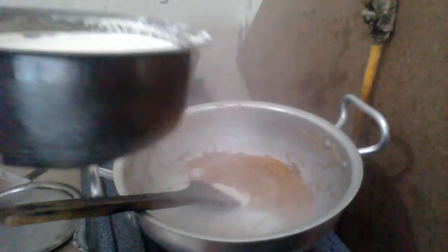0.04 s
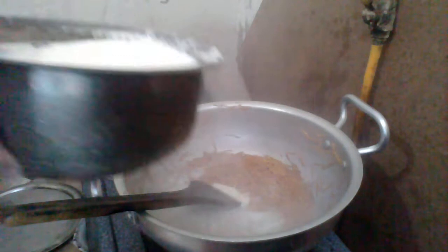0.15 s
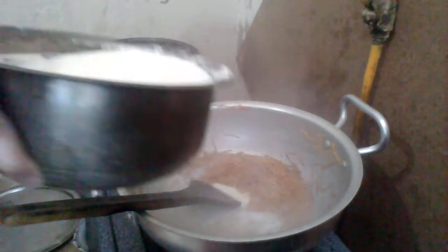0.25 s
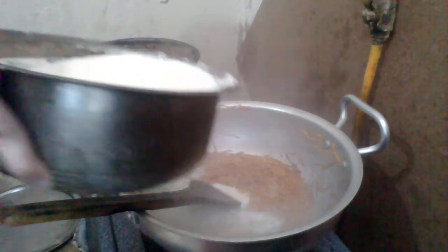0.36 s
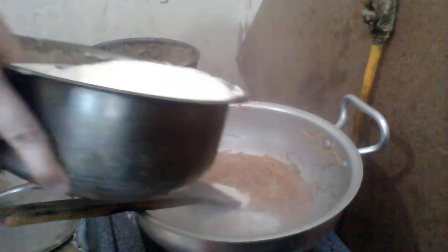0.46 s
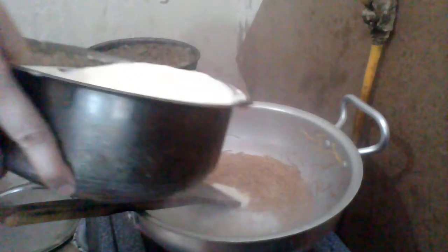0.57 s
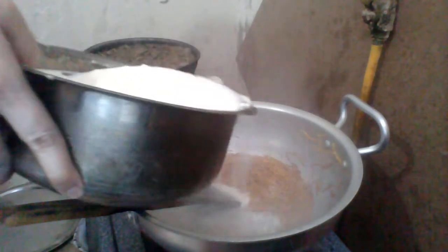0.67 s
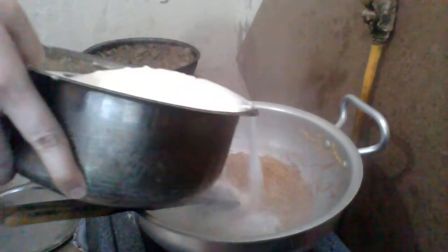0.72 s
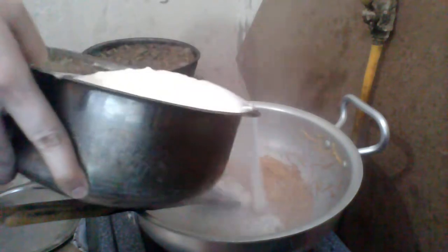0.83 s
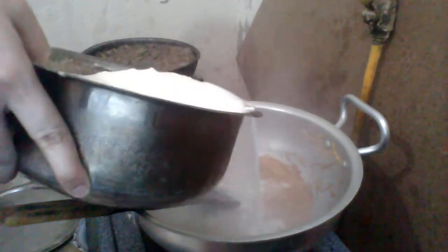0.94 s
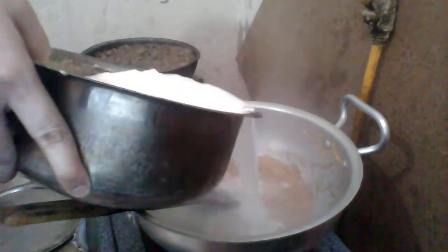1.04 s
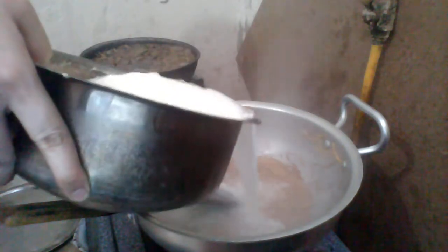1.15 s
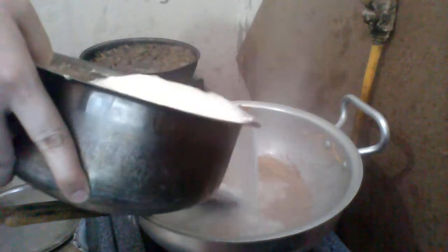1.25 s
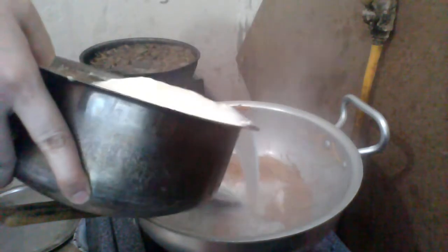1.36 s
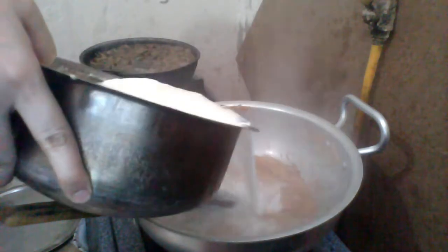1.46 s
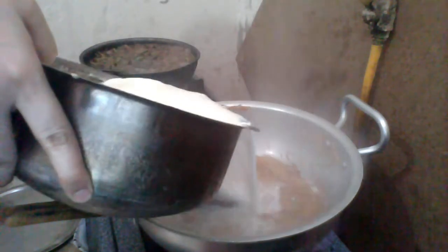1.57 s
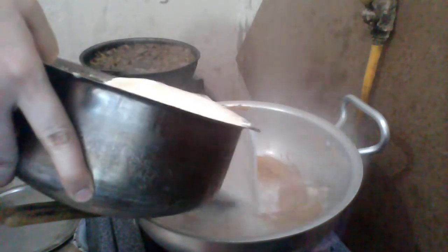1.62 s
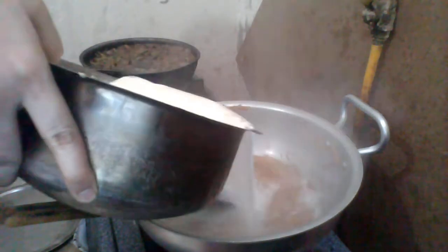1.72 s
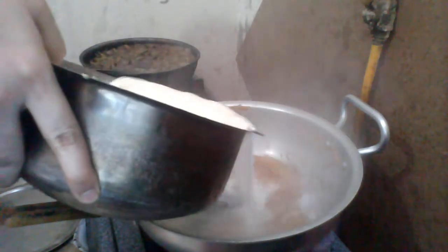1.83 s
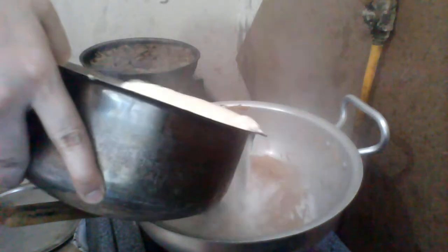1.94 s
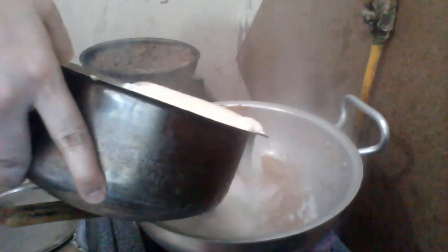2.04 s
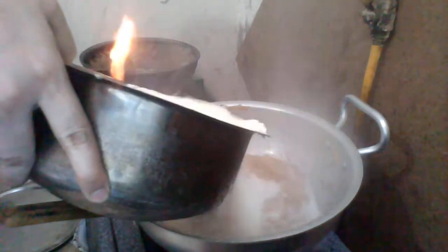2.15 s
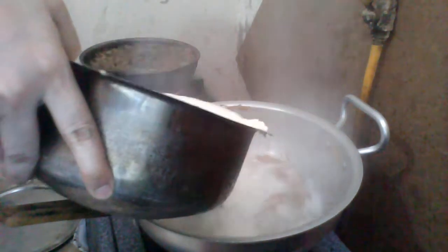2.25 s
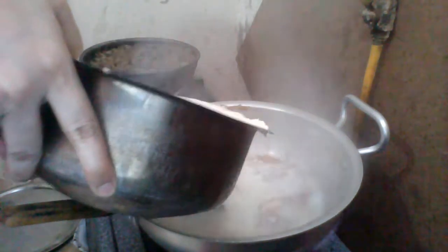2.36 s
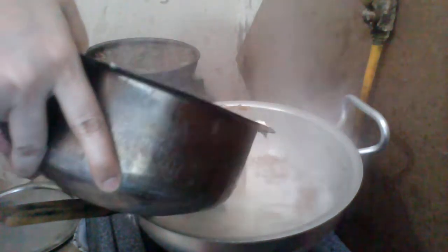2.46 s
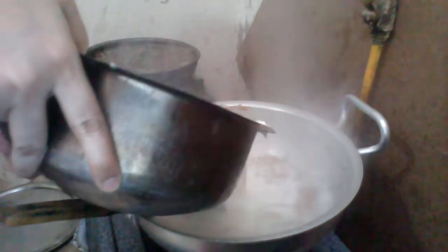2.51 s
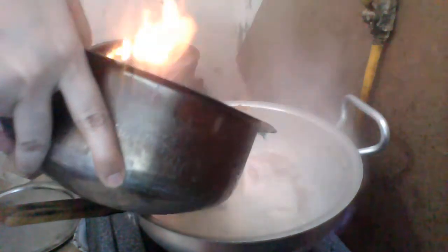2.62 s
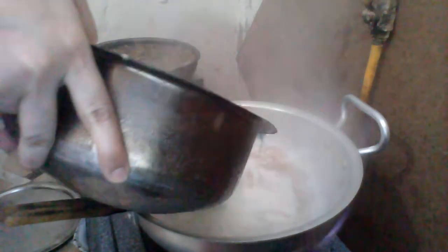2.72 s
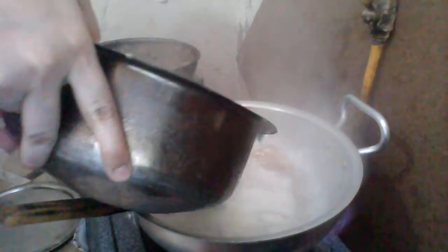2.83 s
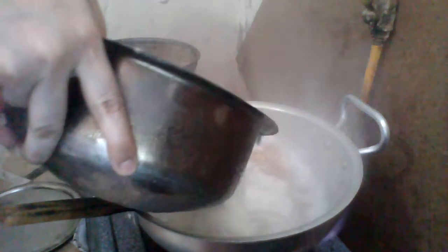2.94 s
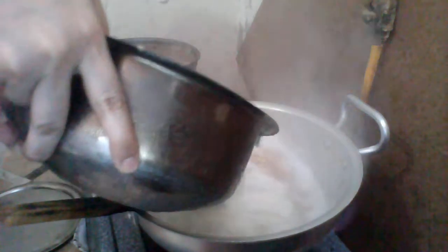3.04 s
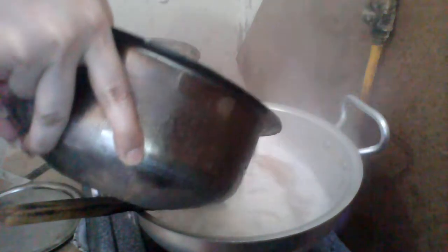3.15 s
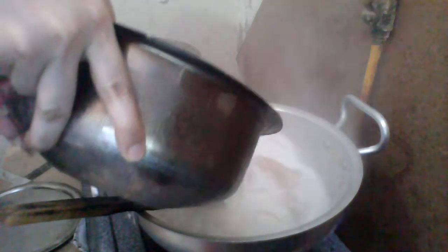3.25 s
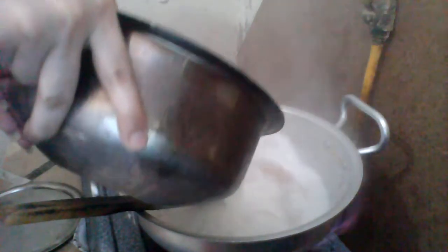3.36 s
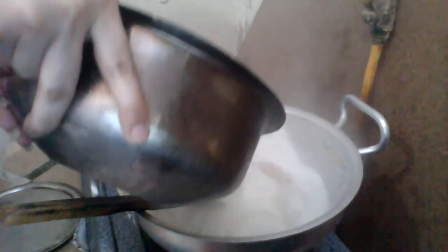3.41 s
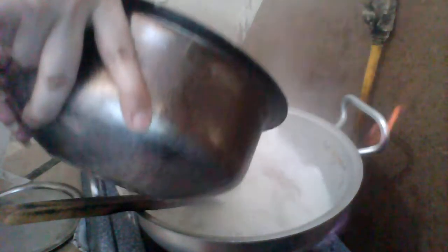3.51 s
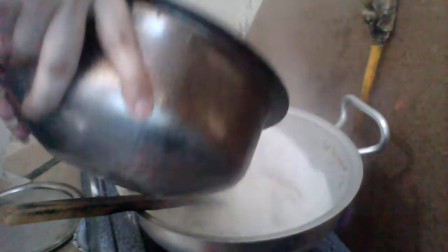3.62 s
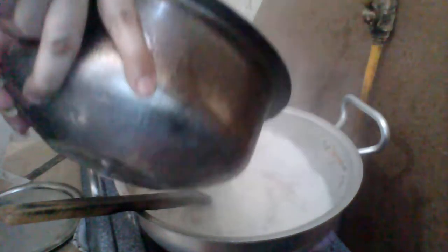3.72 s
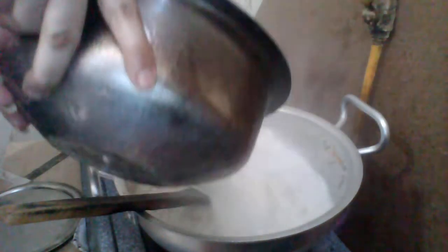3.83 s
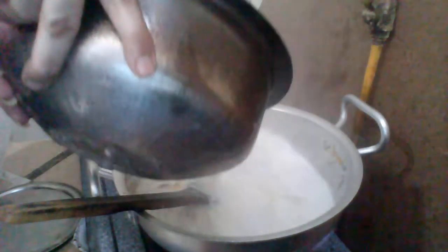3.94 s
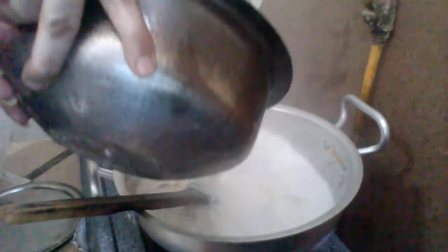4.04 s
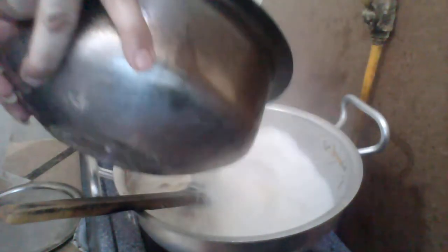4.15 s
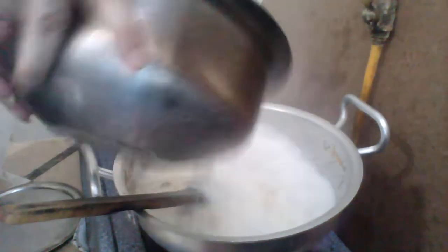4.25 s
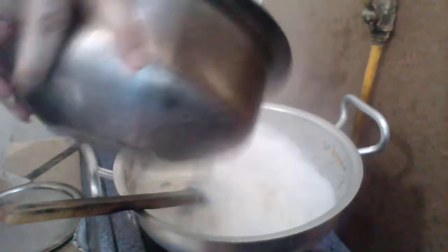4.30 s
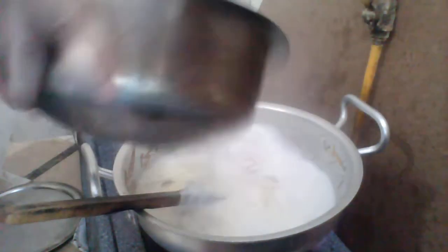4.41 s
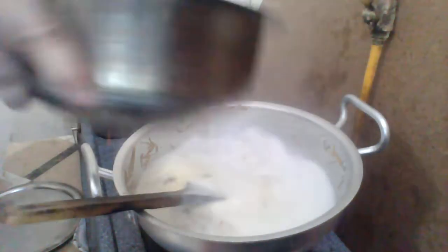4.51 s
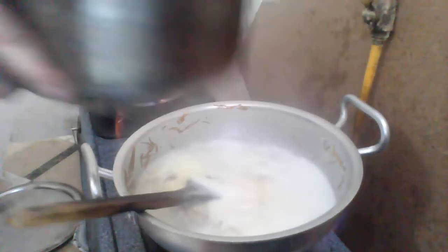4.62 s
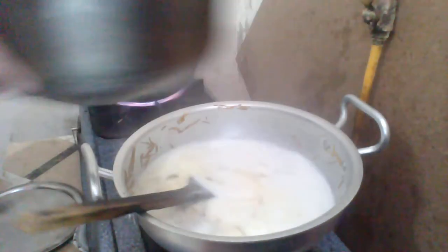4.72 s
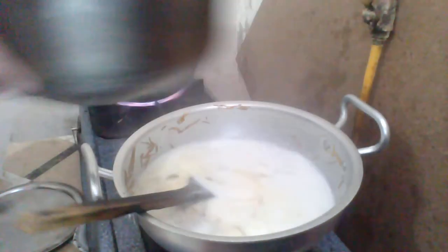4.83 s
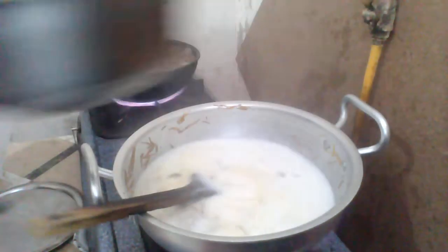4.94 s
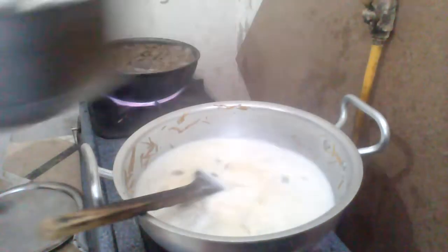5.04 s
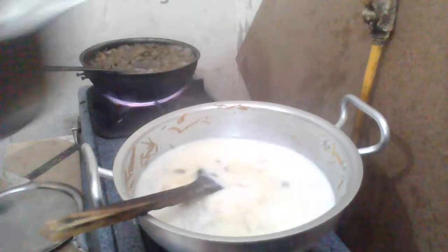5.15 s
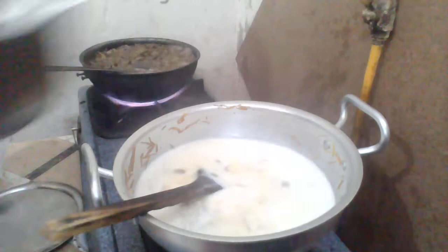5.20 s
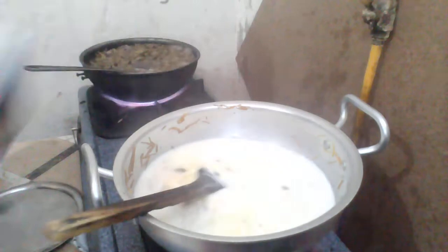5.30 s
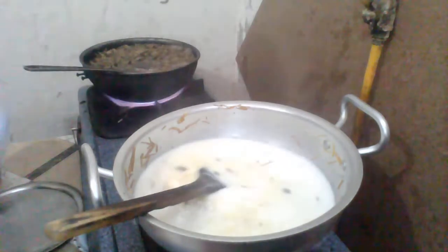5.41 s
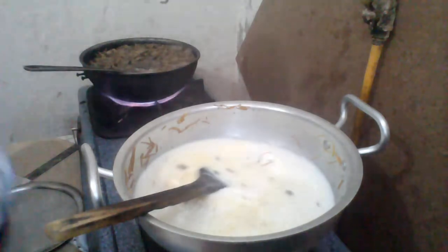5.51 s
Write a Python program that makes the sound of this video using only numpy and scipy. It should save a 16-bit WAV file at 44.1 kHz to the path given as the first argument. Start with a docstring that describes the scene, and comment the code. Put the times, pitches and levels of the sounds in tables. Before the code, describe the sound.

Hot fat sizzles and spits in a metal pan, then hisses, squeals and bubbles as milk goes in, gradually calming down.

```python
"""Milk poured into a hot pan

Milk hits a very hot metal pan of ghee and noodles, heard close up in a small kitchen with a gas stove.
The fat sizzles and spits. The milk flashes to steam on the bare metal, roaring and squealing in the
hollow of the pan, gurgles as the pool deepens, then cools the pan until only a soft fizz is left."""
import sys
import numpy as np
from scipy import signal
from scipy.fft import rfft, irfft, next_fast_len
from scipy.io import wavfile
from scipy.ndimage import map_coordinates

SR = 44100
rng = np.random.default_rng(int(sys.argv[2]) if len(sys.argv) > 2 else 0)


def output_pcm(signal):
    """Save a mono or channel-first signal as 16-bit PCM at the path in sys.argv[1].

    Samples are clipped to [-1, 1] before scaling.
    """
    pcm = np.clip(np.atleast_2d(signal).T, -1, 1) * 32767
    wavfile.write(sys.argv[1], SR, np.round(pcm).astype(np.int16))


N = 245504
TIME = np.arange(N) / SR
TOP_HZ = 8199  # spits and the final sound are cut off above this

# The sizzle fades as the milk cools the pan: (time [s], level [dB])
SIZZLE_LEVEL = [(0, -45), (0.75, -47), (1.5, -44.5), (2.08, -45), (2.6, -42.5), (2.74, -45), (3.3, -46.5),
                (3.7, -49.5), (4.05, -49.5), (4.38, -54.5), (4.85, -57), (5.57, -61.5)]
# How much of the pan's floor is under milk: (time [s], share [0-1])
MILK_COVER = [(0, 0.08), (1, 0.46), (2, 0.58), (3, 0.91), (5.57, 0.64)]
# The sizzle sputters while milk wets only patches of the fat: (time [s], flutter depth [dB])
SIZZLE_FLUTTER = [(0, .65), (1.05, 1), (1.6, .7), (3, .55), (5.57, .55)]
# The tone of frying fat, from low to high: (frequency [Hz], level [dB])
FAT_TONE = [(200, -33), (450, -25.5), (780, -25.5), (1100, 4.5), (1450, -6), (1900, 1.5), (2500, 1.5),
            (2880, 0.5), (3200, 2), (4000, 0.5), (4800, -2), (6300, -3.5), (7000, -10), (8000, -24.5)]

def sizzle(surge):
    """Water crackles in hot fat; milk foam makes finer bubbles than bare ghee, and the metal rings."""
    cover = over_time(MILK_COVER)
    crackle = coloured(bursts(per_second=5000, spread_db=2) + 0.67 * rng.standard_normal(N), FAT_TONE)
    fine = filtered(crackle, lambda hz: 1 / (1 + (4600 / (hz + 1)) ** 6))
    coarse = filtered(crackle, lambda hz: 1 / (1 + (hz / 1400) ** 6))
    fine_db = 7.64 * cover - 4
    coarse_db = 0.5 - 0.3 * TIME  # the largest bubbles slowly fade
    frying = crackle + coarse * (amp(coarse_db) - 1) + fine * (amp(fine_db) - 1)
    ring = unit(filtered(bursts(per_second=5000, spread_db=1.5), metal))
    flutter_db = over_time(SIZZLE_FLUTTER) * (wobble(36) + 0.98 * wobble(100))
    level = np.hypot(amp(over_time(SIZZLE_LEVEL)), amp(-11.5) * surge)  # gushes add sizzle
    return level * amp(flutter_db) * (frying + amp(-3) * cover * ring)


# The notes at which the metal pan rings: (pitch [Hz], width [Hz], level [dB])
PAN_NOTES = [(2505, 130, 6.5), (2655, 120, 4.5), (3070, 100, -2), (3516, 210, 3), (4000, 150, -2),
             (4410, 170, -3), (4920, 110, -3.5), (5320, 81, -8), (5700, 100, -7.5), (6040, 220, -3)]

def metal(hz):
    """How strongly the pan rings at each frequency: all its notes added together."""
    return sum(amp(db) * resonance(hz, centre, width) for centre, width, db in PAN_NOTES)


# The notes of the air in the pan: (pitch [Hz], width [Hz], simmer level [dB], gush level [dB])
AIR_NOTES = [(563.4, 102, -2, -2), (1023, 122, -1.5, -1), (1183, 156, 5.5, 2), (1396, 45, -17.5, 2),
             (1682, 190, 5.5, 4), (2190, 260, -4, -3.5), (2595, 52, -4.5, -16.5)]

def boil(surge):
    """Bubbles collapse on the pan's floor and sound the air above; each note flickers by itself."""
    collapses = bursts(per_second=6000, spread_db=4)
    simmer, roar = np.zeros((2, N))
    for centre, width, simmer_db, gush_db in AIR_NOTES:
        flicker = amp(1.6 * wobble(30))
        # squaring makes the peak's sides steeper; the 1.5 roughly restores its width
        air = flicker * filtered(collapses, lambda hz: resonance(hz, centre, 1.5 * width) ** 2)
        simmer += amp(simmer_db) * air
        roar += amp(gush_db) * air
    steady = amp(over_time(SIZZLE_LEVEL) - 6.5 - 0.5 * TIME)  # fades faster than the sizzle
    return (steady ** 2 * unit(simmer) + surge ** 2 * unit(roar)) / np.hypot(steady, surge)


# Gushes of milk: (time [s], half length [s], boiling level [dB], gurgling level [dB])
MILK_GUSHES = [(1.036, 0.044, -53.5, -89), (1.44, 0.027, -56, -69), (1.575, 0.055, -44, -81),
               (1.81, 0.086, -38.5, -73), (2.253, 0.033, -40, -53.5), (2.46, 0.073, -40, -58.5),
               (2.611, 0.019, -40, -51), (2.676, 0.049, -53, -51.5), (2.855, 0.04, -58, -56),
               (3.252, 0.094, -53, -63.5), (3.452, 0.056, -69, -64.5)]

def gushes():
    """Each gush swells and ebbs, boiling up on the metal (surge) and stirring the pool (churn)."""
    surge, churn = np.zeros((2, N))
    for peak_s, half_s, boil_db, gurgle_db in MILK_GUSHES:
        swell = np.exp(-((TIME - peak_s) / half_s) ** 2 / 2)
        surge = np.maximum(surge, amp(boil_db) * swell)
        churn = np.maximum(churn, amp(gurgle_db) * swell)
    return surge, churn


def stream(start_s=1.57, peak_s=2.617, build_db_per_s=58.5, grow_db_per_s=10, die_db_per_s=66.5):
    """The milk stream's strength: it builds quickly, grows as the pot tilts and dies as it empties."""
    fade_in_db = -build_db_per_s * np.maximum(start_s - TIME, 0)
    past_peak = TIME - peak_s
    return amp(fade_in_db + np.minimum(grow_db_per_s * past_peak, -die_db_per_s * past_peak))


# The loudest steam squeals: (start [s], length [s], pitch [Hz], level [dB])
LOUD_SQUEALS = [(0.209, 0.011, 1246, -45), (0.772, 0.03, 570, -54.5), (0.96, 0.16, 950, -55),
                (1.05, 0.05, 1730, -51), (1.215, 0.059, 600, -53.5), (1.263, 0.059, 1665, -45),
                (1.2, .26, 5025, -57), (1.316, 0.1, 564, -52.5), (1.42, .12, 1052, -46),
                (1.48, 0.074, 1120, -48.5), (1.48, 0.07, 960, -50), (1.427, 0.15, 1632, -46.5),
                (1.462, 0.1, 5850, -49), (1.5, 0.055, 6200, -54), (1.51, 0.19, 5400, -56.5),
                (1.56, 0.084, 6700, -53), (1.55, 0.027, 2164, -42.5), (1.559, 0.08, 3200, -43.5),
                (1.548, 0.052, 5006, -45), (1.585, 0.25, 1652, -42.5), (1.59, 0.018, 1750, -31.5),
                (1.62, 0.065, 610, -50.5), (1.6625, .004, 1660, -30.5), (1.662, 0.01, 2300, -35),
                (1.682, 0.12, 2270, -42.5), (1.72, 0.14, 2190, -46), (1.812, 0.012, 2200, -38.5),
                (1.644, 0.18, 3246, -43.5), (1.784, 0.015, 3260, -38), (1.581, 0.12, 6190, -53),
                (1.8, 0.1, 6080, -54), (1.7, 0.33, 5620, -55.5), (1.45, 0.058, 7450, -55),
                (1.72, 0.048, 7360, -55), (1.95, 0.19, 7400, -59), (1.895, 0.045, 3230, -47),
                (2.11, 0.05, 4990, -50), (1.635, 0.045, 1635, -42.5), (2.43, 0.18, 1722, -44.5),
                (1.742, 0.1, 1325, -45.5), (1.661, 0.067, 5020, -48), (1.689, 0.049, 6640, -48.5),
                (1.695, 0.066, 1236, -45), (1.734, 0.053, 1900, -44), (1.758, 0.04, 960, -42.5),
                (1.75, 0.049, 480, -52.5), (1.769, 0.04, 5038, -45), (1.8, 0.027, 1730, -36.5),
                (1.894, 0.097, 627, -51), (1.91, .1, 2670, -42), (1.871, 0.21, 1639, -45.5),
                (1.937, 0.057, 966, -44), (1.98, 0.069, 6200, -49.5), (1.99, 0.061, 1900, -46),
                (1.991, 0.059, 1155, -45), (2.07, 0.02, 5000, -45), (2.066, 0.11, 520, -51.5),
                (2.085, 0.1, 5300, -51), (2.118, 0.12, 2700, -45.5), (2.125, 0.085, 1604, -42.5),
                (2.13, 0.034, 3760, -42.5), (2.161, 0.038, 6400, -46), (2.202, 0.067, 1001, -44.5),
                (2.16, 0.36, 5560, -48), (2.238, 0.036, 511, -48.5), (2.246, 0.064, 1070, -46.5),
                (2.222, 0.27, 2620, -46), (2.278, 0.036, 3730, -41), (2.323, 0.15, 3900, -49),
                (2.247, 0.057, 2330, -52), (2.285, 0.34, 1630, -45.5), (2.29, 0.35, 1900, -46),
                (2.307, 0.12, 7000, -50), (2.32, 0.063, 510, -51.5), (2.335, 0.04, 4080, -45.5),
                (2.371, 0.21, 6170, -50), (2.372, 0.085, 6600, -47.5), (2.408, 0.028, 2614, -36),
                (2.41, 0.02, 3779, -41), (2.39, 0.18, 4860, -45), (2.336, 0.34, 5350, -52.5),
                (2.41, 0.05, 1400, -46), (2.488, 0.2, 2195, -48.5), (2.436, 0.029, 5590, -44.5),
                (2.44, 0.078, 629, -45), (2.443, 0.081, 1710, -45.5), (2.447, 0.038, 1087, -41.5),
                (2.526, 0.058, 2723, -41), (2.546, 0.2, 6380, -50), (2.53, 0.18, 6930, -53),
                (2.553, 0.12, 7180, -51.5), (2.56, 0.26, 672, -49.5), (2.584, .05, 2092, -41),
                (2.55, 0.14, 3525, -43), (2.597, 0.063, 3530, -43), (2.6, .033, 3760, -38),
                (2.605, 0.056, 5560, -38.5), (2.622, 0.043, 2543, -39.5), (2.659, 0.08, 1050, -50),
                (2.68, 0.069, 2640, -46.5), (4.84, 0.059, 2520, -61)]
# Pitches the faint squeals gather around: (pitch [Hz], relative level [dB])
FAINT_PITCHES = [(580, -3), (1030, 3), (1340, -10.5), (1720, 0.5), (2170, -6), (2650, -0.5), (3700, -4.5),
                 (4800, -4), (5600, 0), (6150, -5), (6550, -6.5), (7250, -9.5)]

def squeals(count=180, first_s=1.3, last_s=2.9, scatter_hz=85.3):
    """Steam squeals where milk meets dry hot metal: loud ones above a chorus of faint ones."""
    loud, faint = np.zeros((2, N))
    for start, length, hz, db in LOUD_SQUEALS:
        add(loud, start, amp(db) * squeal(hz, length, breathiness=0.65, samples=SR // 2))
    for k, (when, detune, size) in enumerate(rng.random((count, 3))):
        hz, db = FAINT_PITCHES[k % len(FAINT_PITCHES)]
        pitch = hz + scatter_hz * (2 * detune - 1)
        start = first_s + (last_s - first_s) * (k + when) / count
        add(faint, start, amp(db + 6 * size) * squeal(pitch, 0.1, breathiness=1.1, samples=SR // 6))
    return loud + amp(-44.5) * stream() * unit(faint)


def squeal(hz, length, breathiness, samples, waver_hz=18, sputter_hz=45.6, rasp_hz=150, release_s=0.01):
    """One pocket of steam sings at a nearly steady pitch: it flares, sputters with a rasp and dies."""
    t = np.arange(samples) / SR
    pitch = hz + waver_hz * band_noise(samples, 0, sputter_hz)
    tone = np.sqrt(2) * np.sin(2 * np.pi * np.cumsum(pitch) / SR)
    breath = breathiness * band_noise(samples, hz, width_hz=70)
    attack_s = 0.0013 + 0.064 * length  # longer squeals swell more slowly
    swell = (1 - np.exp(-t / attack_s)) * np.exp(-np.maximum(t - length, 0) / release_s)
    sputter_db = band_noise(samples, 0, sputter_hz) + 1.9 * band_noise(samples, 0, rasp_hz)
    return unit(swell * amp(sputter_db) * (tone + breath)) * np.sqrt(np.mean(swell ** 2))


# Big air pockets gulping in the pool: (time [s], pitch [Hz], level [dB])
BIG_GULPS = [(1.43, 152, -57), (1.595, 346, -52), (1.746, 367, -43.5), (1.805, 349, -42), (2.152, 358, -49),
             (2.263, 274.5, -47.5), (2.556, 305, -44.5), (2.639, 118.4, -52), (3.139, 377, -53),
             (3.234, 177, -55.5), (3.29, 229, -51.5), (3.479, 163.5, -60.5)]
# The tone of the bubbling pool: (frequency [Hz], level [dB])
POOL_TONE = [(35, -16), (60, -23), (90, 2.5), (125, -3), (180, -3), (310, 2.5), (390, 1), (450, -11.5),
             (750, -20.5), (1600, -54)]

def gurgle(churn, count=1300, plunge_db=-60, simmer_db=-79):
    """The stream drags air under the simmering pool: many small bubbles and a few big gulps."""
    small, big = np.zeros((2, N))
    for when, pitch, size in rng.random((count, 3)):
        hz = 90 * 5 ** pitch
        add(small, when * N / SR, amp(25 * size) * hz * bubble(hz, cycles=23, rise=0.16))
    for start, hz, db in BIG_GULPS:
        add(big, start, amp(db) * bubble(hz, cycles=20, rise=0.058))
    pool = coloured(unit(small) + 2.3 * rng.standard_normal(N), POOL_TONE)
    deep = filtered(pool, lambda hz: 1 / (1 + (hz / 200) ** 4))
    deep_db = 7.8 * over_time(MILK_COVER) - 7.5  # deep bubbles come as the pool fills
    level = np.hypot(amp(plunge_db) * stream() + amp(simmer_db), churn)
    return big + level * (pool + deep * (amp(deep_db) - 1))


def bubble(hz, cycles, rise):
    """An air bubble starts softly, rings and rises in pitch as it nears the surface."""
    t = np.arange(int(2 * cycles / hz * SR)) / SR
    age = t * hz / cycles
    tone = np.sin(2 * np.pi * hz * t * (1 + rise * age / 2))
    return tone * np.exp(-2.5 * age) * (1 - np.exp(-25 * age))


# Single spits of fat: (time [s], level of the first 4 ms [dB], brightness [dB per octave], spray [0-1])
FAT_SPITS = [(0.939, -42, -1, 0.53), (0.956, -48, -3, 0.4), (0.999, -39, 3, 0.4), (1.029, -40, -7, 0.4),
             (1.185, -38.5, -3, .45), (1.214, -47, -1, .45), (1.265, -38.5, 0, .45), (1.323, -49, -4, .6),
             (1.6645, -38, -6, .6), (3.137, -44, -2, 0.5), (3.287, -45, -1, .3), (3.3037, -35.5, -8, .75),
             (3.497, -47, -1, .4), (4.246, -43, -2, .5), (4.479, -47, -6, .4), (4.512, -49, -2, 0.5),
             (4.916, -55, -9, .8), (4.9184, -44.5, -7, 0.7)]
# The tone of one spit: (frequency [Hz], level [dB])
SPIT_TONE = [(80, -61), (300, -43.5), (700, -30.5), (1250, -14.5), (1750, -1.5), (4000, 3), (4700, -2),
             (6500, -0.5), (7500, -19.5), (8200, -32.5)]

def spits(snap_s=0.0005, spray_s=0.0042):
    """A drop bursts in the fat: a snap and a short spray."""
    track = np.zeros(N)
    t = np.arange(SR // 16) / SR
    lead, onset = SR // 200, SR // 250  # samples: 5 ms of padding, then the first 4 ms
    for start, db, brightness, spray in FAT_SPITS:
        decay = (1 - spray) * np.exp(-t / snap_s) + spray * np.exp(-t / spray_s)
        burst = np.pad(decay * rng.standard_normal(len(t)), (lead, 0))
        tilt_db = lambda hz: brightness * np.log2(np.maximum(hz, 1000) / 3000)
        pop = filtered(burst, lambda hz: amp(over_pitch(SPIT_TONE, hz) + tilt_db(hz)) * (hz < TOP_HZ))
        onset_level = np.linalg.norm(pop[:lead + onset]) / np.sqrt(onset)
        add(track, start - lead / SR, amp(db) * pop / onset_level)
    return track


# How long the kitchen echoes: (frequency [Hz], time to fade by 60 dB [s])
ECHO_TIMES = [(200, 1), (2000, 0.31), (8000, 0.34)]

def kitchen(sound):
    """The walls answer with a short echo in which low notes last longest."""
    hz, t, noise = signal.stft(rng.standard_normal(SR // 3), SR, nperseg=256)
    decay = amp(-60 * t / over_pitch(ECHO_TIMES, hz)[:, None])
    _, tail = signal.istft(noise * decay, SR, nperseg=256)
    echo = np.pad(tail, (SR // 250, 0)) / np.linalg.norm(tail)  # arrives 4 ms late
    return signal.fftconvolve(sound, echo)[:N]


# The tone of the gas flames: (frequency [Hz], level [dB])
FLAME_TONE = [(25, -9.5), (55, -22.5), (90, -4), (170, -3.5), (300, -11.5), (550, -3.5), (800, -11),
              (3000, -14), (8000, -31)]

def burner():
    """The gas flames murmur steadily."""
    return amp(-70.5) * coloured(rng.standard_normal(N), FLAME_TONE)


def bursts(per_second, spread_db):
    """Tiny steam bubbles burst at random, most small and a few large."""
    happens = rng.random(N) < per_second / SR
    size_db = spread_db * np.minimum(rng.standard_normal(N), 2.6)
    return unit(happens * rng.choice([-1, 1], N) * amp(size_db))


def resonance(hz, centre, width):
    """How strongly something that rings at one pitch answers each frequency."""
    damping = 1j * hz * width
    return damping / (centre ** 2 - hz ** 2 + damping)


def band_noise(samples, centre_hz, width_hz):
    """Noise around one frequency, at level 1; centred on 0 it is a random flutter."""
    hz = np.fft.rfftfreq(samples, 1 / SR)
    spectrum = rfft(rng.standard_normal(samples)) / (1 + ((hz - centre_hz) / width_hz) ** 4)
    return unit(irfft(spectrum, samples))


def wobble(per_second):
    """A smooth curve through this many random values a second."""
    return map_coordinates(rng.standard_normal(int(N * per_second / SR) + 4), [TIME * per_second])


def amp(db):
    """Turn decibels into a gain to multiply by."""
    return 10 ** (np.asarray(db) / 20)


def unit(sound):
    """Scale a sound to an average (rms) level of 1."""
    return sound / np.sqrt(np.mean(sound ** 2) + 1e-20)


def over_time(points):
    """Join (time, value) points into one value per sample."""
    return np.interp(TIME, *np.transpose(points))


def over_pitch(points, hz):
    """Read between (frequency, value) points, with octaves evenly spaced."""
    frequencies, values = np.transpose(points)
    return np.interp(np.log(hz + 1), np.log(frequencies + 1), values)


def filtered(sound, response):
    """Multiply each frequency in a sound by response(hz)."""
    size = next_fast_len(len(sound) + SR // 4)
    return irfft(rfft(sound, size) * response(np.fft.rfftfreq(size, 1 / SR)), size)[:len(sound)]


def coloured(sound, tone):
    """Shape a sound with a tone table and scale it to level 1."""
    return unit(filtered(sound, lambda hz: amp(over_pitch(tone, hz))))


def add(track, start_s, sound):
    """Mix a sound into the track at a given time."""
    start = round(start_s * SR)
    track[start:start + len(sound)] += sound[:max(N - start, 0)]


def scene():
    """The pan, its room and the stove, the same in both channels."""
    surge, churn = gushes()
    pan = sizzle(surge) + boil(surge) + squeals() + gurgle(churn) + spits()
    mono = pan + amp(-12.5) * kitchen(pan) + burner()
    return np.array([mono, mono])


# Narrow bands that are quieter at the microphone: (frequency [Hz], width [Hz], depth [dB])
QUIET_BANDS = [(435, 18, 4.5), (751, 30, 3.5), (2860, 90, 3)]

def record(dry):
    """The microphone's sound: a few narrow dips, and treble that falls away quickly and then ends."""
    def response(hz):
        dip_db = sum(db * np.exp(-((hz - centre) / width) ** 2) for centre, width, db in QUIET_BANDS)
        return amp(-dip_db) * (hz < TOP_HZ) / (1 + (hz / 7350) ** 30)
    return np.array([filtered(channel, response) for channel in dry])


dry = scene()
out = record(dry)
output_pcm(out)
```